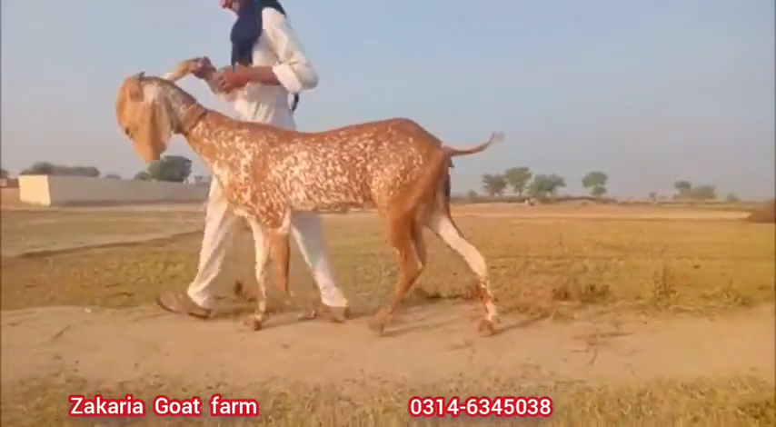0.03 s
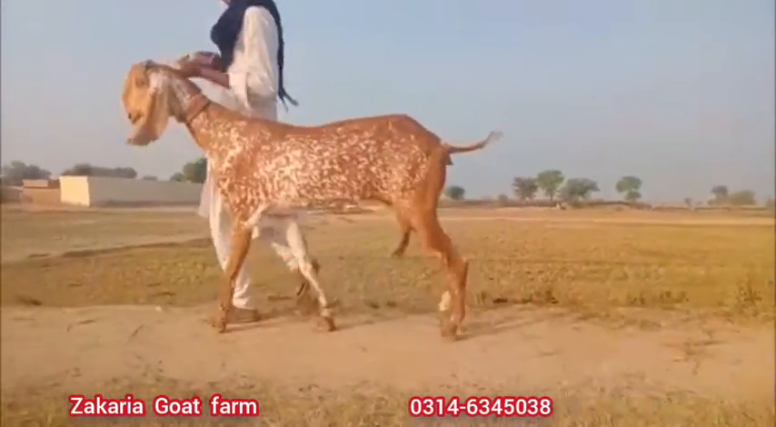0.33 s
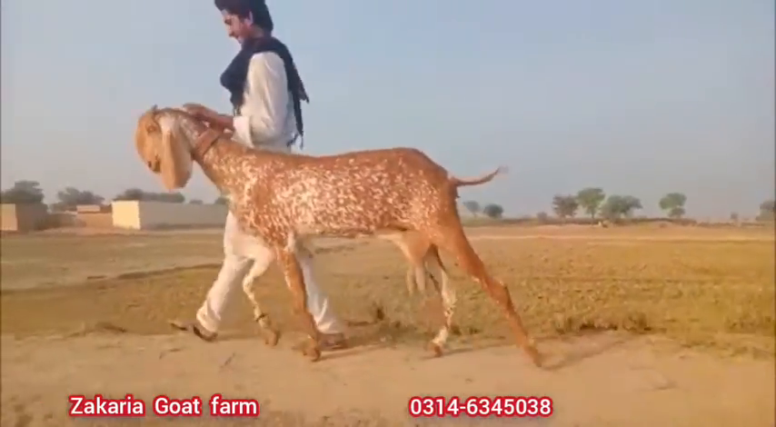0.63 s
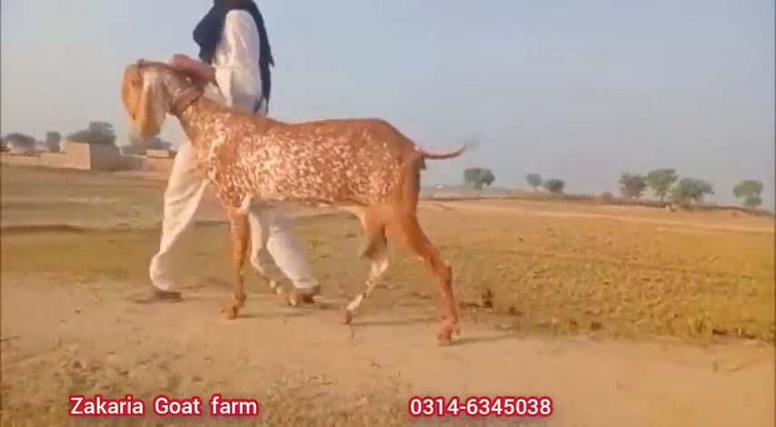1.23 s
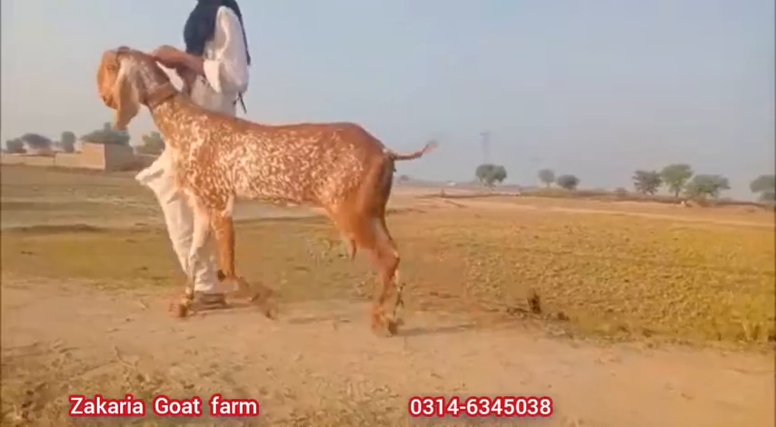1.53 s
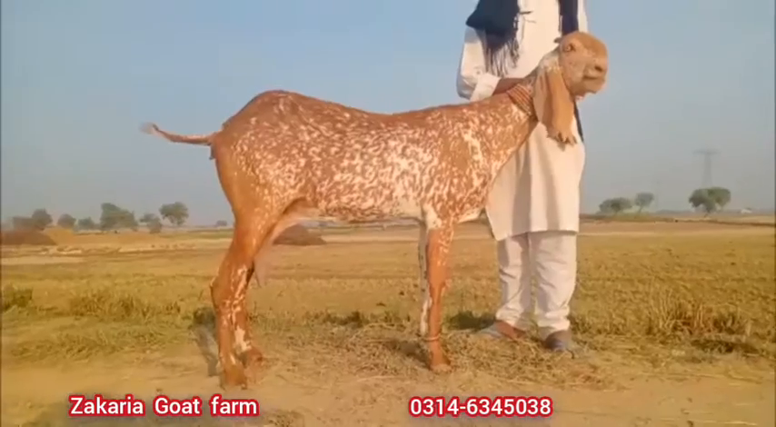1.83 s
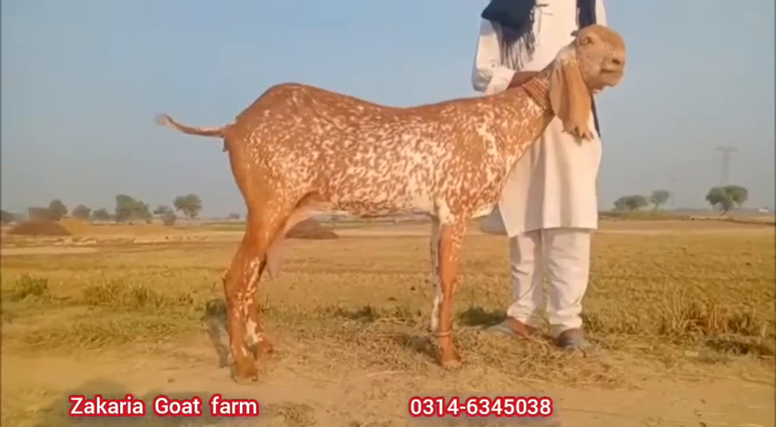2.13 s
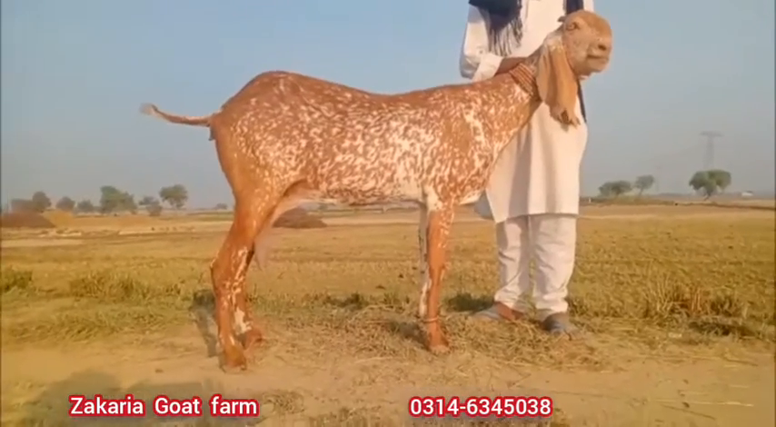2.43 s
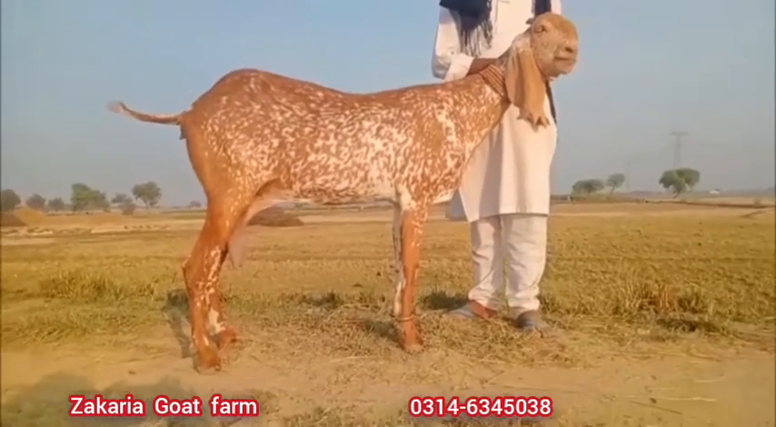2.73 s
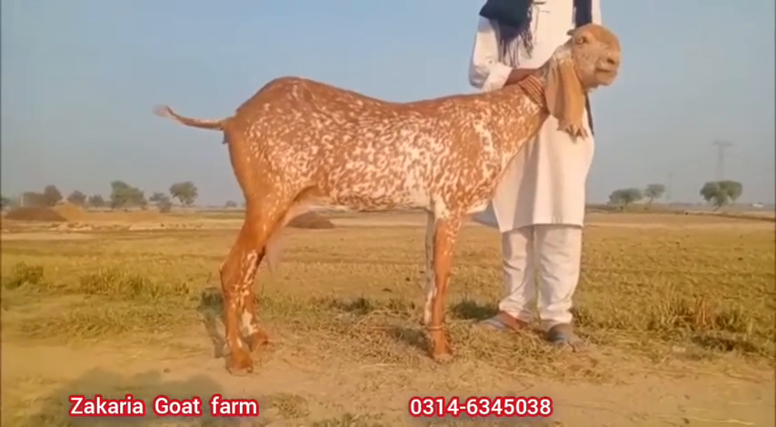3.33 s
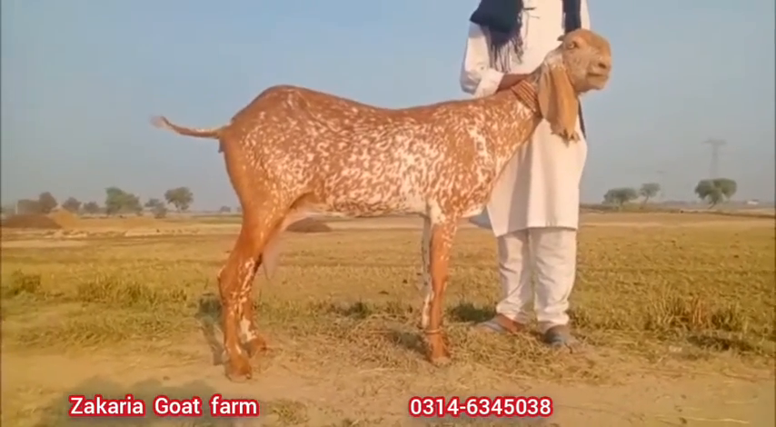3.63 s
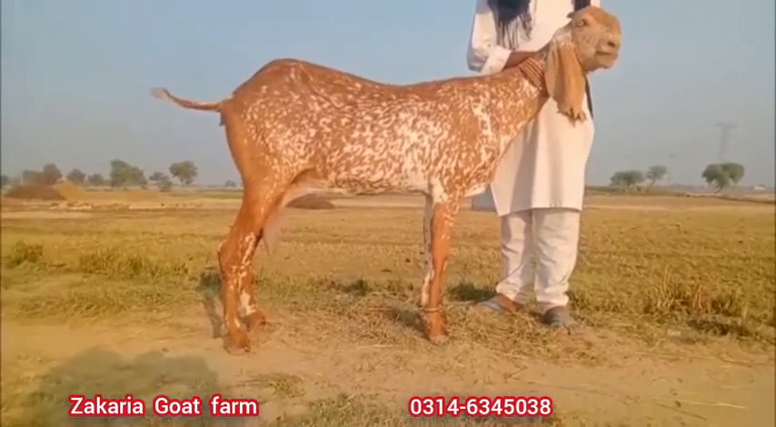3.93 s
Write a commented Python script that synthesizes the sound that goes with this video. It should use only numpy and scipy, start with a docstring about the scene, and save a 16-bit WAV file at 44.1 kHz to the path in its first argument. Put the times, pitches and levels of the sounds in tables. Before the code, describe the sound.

A goat's little bells jingle with each step, then go quiet as a faint bird whistles.

```python
"""Over a hiss of open air and dry grass, a goat walks a dirt path. At each step pellets strike the shells
of its small bells and excite their modes; feet crush grit, and damped knocks sound close by.
Near 1.7 s the level dips briefly and returns on the goat standing, its bells barely stirring.
A last loud knock sounds and light wind rumbles; then a bird whistles in gliding tones,
joined by a few faint scuffs, knocks and ticks."""
import sys
import numpy as np
from scipy import signal
from scipy.fft import rfft, irfft
from scipy.io import wavfile
from scipy.ndimage import uniform_filter1d

SR = 44100
rng = np.random.default_rng(int(sys.argv[2]) if len(sys.argv) > 2 else 0)


def dump_mix(stems):
    """Bounce the given channels to the path in sys.argv[1] as a 16-bit WAV at rate SR."""
    frames = np.atleast_2d(stems).T  # one column per channel
    limited = np.clip(frames, -1, 1)  # hard clip at full scale
    pcm = np.round(limited * 32767).astype(np.int16)
    wavfile.write(sys.argv[1], SR, pcm)


N = 176400
STOP_S = 1.69  # the walk ends
DEEP_BELOW_HZ, OVERTONES_ABOVE_HZ, STANDING_TOP_HZ, TOP_HZ = 3600, 5500, 10500, 15600


def undb(db):
    """Decibels to amplitude ratio."""
    return 10 ** (np.asarray(db) / 20)


def unit(x):
    """Normalisation to rms 1."""
    return x / np.sqrt(np.mean(x ** 2) + 1e-20)


def curve(points):
    """Linear interpolation of (time [s], value) points."""
    return np.interp(np.arange(N) / SR, *np.array(points).T)


def colour(x, points):
    """Minimum-phase filter through (frequency [Hz], gain [dB]) points, scaled to unit power gain."""
    hz, db = np.array(points).T
    log_hz = np.log(np.fft.rfftfreq(4096, 1 / SR) + 1)
    gain = undb(np.interp(log_hz, np.log(hz), db))
    cepstrum = irfft(np.log(unit(gain)))
    half = len(cepstrum) // 2
    cepstrum[1:half] *= 2
    cepstrum[half + 1:] = 0
    return signal.fftconvolve(x, irfft(np.exp(rfft(cepstrum))))[:len(x)]


def cut(x, hz, kind, order=4):
    """Maximally flat high-pass or low-pass filter."""
    return signal.sosfilt(signal.butter(order, hz, kind, fs=SR, output="sos"), x)


def drift(rate_hz):
    """Smoothed random fluctuation of rms 1."""
    hold = int(SR / rate_hz)
    steps = np.repeat(rng.standard_normal(N // hold + 1), hold)
    return unit(uniform_filter1d(steps, hold)[:N])


def fade(t, t60):
    """Exponential decay, 60 dB in t60."""
    return np.exp(-np.log(1000) * t / t60)


def add(out, start_s, x):
    """Superposition of x on out from a given time."""
    i = int(start_s * SR)
    out[i:i + len(x)] += x[:max(len(out) - i, 0)]


# spectra of distant hiss and of dry grass (frequency [Hz], relative level [dB])
AIR_SPECTRUM = [(30, -15), (134, -2.5), (300, -8), (700, -19), (4000, -25), (5400, -44), (9000, -39),
                (16000, -61)]
GRASS_SPECTRUM = [(300, -17), (2300, 8.5), (6000, -34.5), (15000, -31)]
def air():
    """Broadband noise: the fields hiss, louder during the walk, and grass rustles in the breeze."""
    walking = np.arange(N) < STOP_S * SR
    hiss = colour(rng.standard_normal(N), AIR_SPECTRUM) * undb(-54.5 + 8 * walking)
    rustle_db = -64.5 + 4 * (drift(37) + drift(500)) / np.sqrt(2)
    return hiss + colour(rng.standard_normal(N) * undb(rustle_db), GRASS_SPECTRUM)


def stirring(touches_per_s=65, walking_db=-44.5, standing_db=-74, settle_s=0.21):
    """Random impulse excitation: loose pellets touch the bells, ever more softly once the goat stands."""
    out = np.zeros(N)
    for _ in range(4):
        touches = (rng.random(N) < touches_per_s / SR) * rng.standard_normal(N)
        response = shake(length_s=0.005, gains=undb([-3, 0, -9]))
        out += signal.fftconvolve(touches, response)[:N]
    motion = np.exp(-np.maximum(np.arange(N) / SR - STOP_S, 0) / settle_s)
    return unit(out) * undb(standing_db + (walking_db - standing_db) * motion)


# modes of the shells, and spectrum of shell hitting shell (frequency [Hz], relative level [dB])
SHELL_MODES = [(2702, -14), (3241, -5), (3519, 4.5), (3752, -6), (3871, -2), (3900, 1), (4051, -2.5),
               (4239, 1), (4275, -2), (4330, -4.5), (4400, -3.5), (4560, -4.5), (4660, -2.5), (5044, -9),
               (6095, -4), (6788, -11), (7451, 0.5), (7741, -8), (8387, -3), (8806, -1), (9039, -1),
               (9555, -2.5), (10406, -3), (13216, -4)]
CLASH_SPECTRUM = [(2500, -6), (3300, -5.5), (4300, 11.5), (5500, -18), (7500, -6), (10000, -1.5),
                  (15500, -31)]
def shake(length_s, gains, strikes=52, strikes_per_s=200, strays=48, stray_db=-10.5):
    """Modal superposition: each pellet strike in a dying flurry excites some shell modes and a clack."""
    t = np.arange(13500) / SR
    stray_hz = rng.uniform(OVERTONES_ABOVE_HZ, TOP_HZ, strays)  # weak overtones, new in each shake
    hz, db = np.vstack([SHELL_MODES, [(f, stray_db) for f in stray_hz]]).T
    band = np.digitize(hz, [DEEP_BELOW_HZ, OVERTONES_ABOVE_HZ])  # deep notes, main notes, overtones
    t60_s = np.array([.115, .095, .115])[band, None]
    excited_share = np.array([.8, .4, .2])[band, None]
    pitch_spread = np.array([.0015, .007, .002])[band, None]

    gaps = rng.exponential(1 / strikes_per_s, strikes)
    strike_s = np.cumsum(gaps) - gaps
    force = undb(3 * rng.standard_normal(strikes)) * np.exp(-(strike_s / length_s) ** 2)
    force[0] = undb(5.5)
    shape = (len(hz), strikes)
    excited = rng.random(shape) < excited_share
    kicks = excited * force * undb(db[:, None] + 3.5 * rng.standard_normal(shape))
    kicks *= rng.choice([-1, 1], shape)
    bent_hz = hz[:, None] * (1 + pitch_spread * rng.standard_normal(shape))
    pole = 2j * np.pi * bent_hz - np.log(1000) / t60_s
    propagator = np.exp(np.cumsum(pole * gaps, axis=1) - pole * gaps)
    state = np.cumsum(kicks / propagator, axis=1) * propagator  # complex amplitude after each strike

    latest = np.searchsorted(strike_s, t, side="right") - 1
    since = t - strike_s[latest]
    modes = (state[:, latest] * np.exp(pole[:, latest] * since)).imag  # free decay between strikes
    ring = sum(gain * unit(modes[band == k].sum(axis=0)) for k, gain in enumerate(gains))
    clack = force[latest] * fade(since, t60=.022) * rng.standard_normal(len(t))
    clash = unit(colour(clack, CLASH_SPECTRUM)) * np.hypot(gains[1], gains[2]) * undb(-13)
    rise_s = 0.00035 + length_s ** 2 / 1.87  # long shakes build up gently
    return (ring + clash) * np.sqrt(1 + length_s * 50) * (1 - np.exp(-t / rise_s))


# shakes of the bell string, with levels relative to each band's offset
# (time [s], flurry length [s], deep level [dB], main level [dB], overtone level [dB])
BELL_SHAKES = [(0.049, 0.034, -40, -34, -30.5), (0.088, 0.091, -37.5, -32.5, -37),
               (0.142, 0.016, -28.5, -25, -33.5), (0.18, 0.024, -33, -42, -40.5),
               (0.224, 0.043, -31, -35.5, -49), (0.318, 0.0076, -37.5, -37.5, -51),
               (0.384, 0.0028, -38.5, -45, -62), (0.479, 0.045, -23, -33.5, -30),
               (0.552, 0.058, -28.5, -32.5, -35), (0.591, 0.038, -43, -25.5, -35),
               (0.64, 0.088, -42.5, -29, -47.5), (0.722, 0.051, -53, -27.5, -43),
               (0.86, 0.02, -45, -35, -44.5), (0.886, 0.025, -41.5, -28, -29.5),
               (0.929, 0.045, -33.5, -25.5, -29.5), (0.976, 0.011, -31, -27, -35),
               (1.091, 0.038, -34.5, -38.5, -45.5), (1.202, 0.065, -41, -48, -46),
               (1.26, 0.032, -27, -33.5, -35), (1.297, 0.037, -36, -24.5, -30),
               (1.333, 0.022, -33, -28, -34), (1.361, 0.044, -38, -33, -42),
               (1.43, 0.041, -44, -32.5, -44.5), (1.482, 0.065, -50, -40, -75),
               (1.552, 0.013, -38, -32.5, -42.5), (1.6, 0.042, -60, -31, -35.5),
               (1.627, 0.01, -53, -35, -29), (1.656, 0.019, -38.5, -25.5, -33.5),
               (1.975, 0.063, -72, -61, -78), (2.169, 0.18, -81, -60, -59), (2.681, 0.25, -79, -62.5, -63),
               (3.14, 0.12, -71, -65, -67), (3.52, 0.17, -68.5, -66.5, -64.5)]
def bells(band_offsets_db=(-11, -10, -10.5)):
    """Impact excitation: steps shake the bells; the softer touches at rest have less treble."""
    walking, standing, stir = np.zeros(N), np.zeros(N), stirring()
    for start, length_s, *levels_db in BELL_SHAKES:
        gains = undb(np.add(levels_db, band_offsets_db))
        add(walking if start < STOP_S else standing, start, shake(length_s, gains))
    dulled = cut(standing + stir, STANDING_TOP_HZ, "low", order=3)
    jingle = np.where(np.arange(N) < STOP_S * SR, walking + stir + tinks(), dulled)
    return cut(jingle, hz=2400, kind="high")


# footfalls on grit (time [s], decay constant [s], level [dB])
FOOT_SCUFFS = [(0.174, 0.029, -39), (0.336, 0.011, -39.5), (0.47, 0.087, -43), (1.266, 0.072, -28.5),
               (1.384, 0.055, -42), (1.447, 0.015, -32.5), (1.605, 0.058, -38), (2.751, 0.042, -47.5),
               (2.915, 0.024, -44), (3.029, 0.015, -45)]
# spectrum of crushed grit (frequency [Hz], relative level [dB])
GRIT_SPECTRUM = [(100, -5), (850, -2), (1500, -9.5), (2500, -4), (5000, -23.5), (15000, -29.5)]
def scuffs(grain_samples=70, spread_db=3.3, rise_s=0.0026):
    """Granular friction: feet crush grit into dense, uneven grains of noise that die away."""
    t, pressure = np.arange(N // 8) / SR, np.zeros(N)
    for start, decay_s, db in FOOT_SCUFFS:
        add(pressure, start, undb(db) * np.exp(-t / decay_s) * np.minimum(t / rise_s, 1))
    grain_db = spread_db * rng.standard_normal(N // grain_samples + 1)
    grains = np.repeat(undb(grain_db), grain_samples)[:N]
    return colour(pressure * unit(grains * rng.standard_normal(N)), GRIT_SPECTRUM)


# close knocks (time [s], body frequency [Hz], relative body level [dB], relative crack level [dB])
CLOSE_KNOCKS = [(0.2424, 620, 2, -35), (0.246, 1080, -13.5, -50), (0.819, 640, -6, -44),
                (1.2721, 594, -11.5, -62), (1.624, 117, -11.5, -12), (1.89, 700, -25, -33.5),
                (1.9263, 740, -0.5, -2.5), (1.9311, 644, -16, -18), (2.811, 800, -23.5, -23),
                (2.892, 860, -26.5, -37.5), (3.824, 620, -21.5, -20)]
# spectrum of the crack (frequency [Hz], relative level [dB])
CRACK_SPECTRUM = [(60, -37), (300, -8), (1200, -3.5), (1800, -7.5), (2300, 0.5), (3800, 3), (5300, -13),
                  (9000, -9), (15500, -41.5)]
def knocks(t60_cycles=2.61):
    """Damped oscillation: one short-lived mode thumps under a bright crack of impulse and noise."""
    t, body, crack = np.arange(2000) / SR, np.zeros(N), np.zeros(N)
    for start, hz, body_db, crack_db in CLOSE_KNOCKS:
        thump = np.sin(2 * np.pi * hz * t) * fade(t, t60_cycles / hz)
        add(body, start, undb(body_db) * thump)
        snap = 0.17 * rng.standard_normal(len(t)) * fade(t, t60=0.0072) - 1.54 * (t == 0)
        add(crack, start, undb(crack_db) * snap)
    return cut(body, hz=216.4, kind="high", order=2) + colour(crack, CRACK_SPECTRUM)


# single bells struck squarely (time [s], frequency [Hz], level [dB])
BELL_TINKS = [(.361, 9040, -24.5), (1.295, 10406, -19), (1.297, 13216, -21)]
def tinks(rise_s=.003):
    """Free vibration of one mode: a bell rings on a single high overtone."""
    t, out = np.arange(N // 20) / SR, np.zeros(N)
    envelope = fade(t, t60=.09) * np.minimum(t / rise_s, 1)
    for start, hz, db in BELL_TINKS:
        add(out, start, undb(db) * np.sin(2 * np.pi * hz * t) * envelope)
    return out


# mean strength of the wind (time [s], level [dB])
WIND_ENVELOPE = [(1.8, -76), (2.0, -45), (2.12, -62), (2.2, -51), (3.1, -54.5), (3.35, -47), (3.6, -49.5),
                 (3.7, -58.5)]
# spectrum of its rumble (frequency [Hz], relative level [dB])
WIND_SPECTRUM = [(30, -27), (135, 0), (200, -22.5), (330, -9.5), (3000, -85)]
def wind(gust_db=1.5):
    """Turbulence: low-frequency noise, modulated in amplitude by random gusts."""
    noise = rng.standard_normal(N)
    level_db = curve(WIND_ENVELOPE) + gust_db * drift(24.88)
    return colour(noise * undb(level_db), WIND_SPECTRUM)


# whistles (time [s], length [s], first pitch [Hz], middle pitch [Hz], last pitch [Hz], level [dB])
BIRD_WHISTLES = [(2.221, 0.12, 3850, 3300, 3200, -53.5), (2.616, 0.065, 3230, 3610, 3360, -54.5),
                 (2.752, 0.085, 3350, 3400, 2900, -54), (3.121, 0.082, 3420, 3630, 3250, -51),
                 (3.265, 0.076, 3330, 3400, 3000, -50.5), (3.665, 0.08, 3450, 3700, 3240, -54.5),
                 (3.788, .09, 3200, 3350, 3130, -54)]
def bird():
    """Frequency modulation: each distant whistle is a wavering pure tone on a parabola of pitch."""
    out = np.zeros(N)
    wobble = 1 + .011 * drift(200)
    for start, length_s, first, middle, last, db in BIRD_WHISTLES:
        progress = np.linspace(0, 1, int(length_s * SR))
        parabola = np.polyfit([0, .5, 1], [first, middle, last], 2)
        hz = np.polyval(parabola, progress) * wobble[int(start * SR):][:len(progress)]
        envelope = np.sqrt(abs(np.sin(np.pi * progress)))
        add(out, start, undb(db) * envelope * np.sin(2 * np.pi * np.cumsum(hz) / SR))
    return out


# close clicks (time [s], level before filtering [dB])
CLOSE_TICKS = [(2.8107, -21), (2.817, -33), (3.336, -36)]
def ticks():
    """Band-limited transients: brief bursts of treble noise with no resonant body."""
    t, out = np.arange(N // 20) / SR, np.zeros(N)
    for start, db in CLOSE_TICKS:
        add(out, start, undb(db) * rng.standard_normal(len(t)) * fade(t, t60=0.0072))
    return cut(cut(out, OVERTONES_ABOVE_HZ, "high"), STANDING_TOP_HZ, "low")


# brief dip of the whole sound between walking and standing (time [s], gain [dB])
LEVEL_DIP = [(1.677, -5), (1.695, -56), (1.71, -19.5), (1.8, -1), (1.92, 0)]
def scene():
    """Linear superposition: all sources sum at one point, under a common gain envelope."""
    mix = bells() + scuffs() + knocks() + ticks() + bird() + air() + wind()
    return (mix * undb(curve(LEVEL_DIP)))[None]


def record(dry):
    """Band limiting: filters remove the deepest rumble and the highest treble."""
    low_pass = signal.ellip(10, .2, 80, TOP_HZ, fs=SR, output="sos")
    return signal.sosfilt(low_pass, cut(dry, hz=35, kind="high"))


dry = scene()
out = record(dry)
dump_mix(out)
```